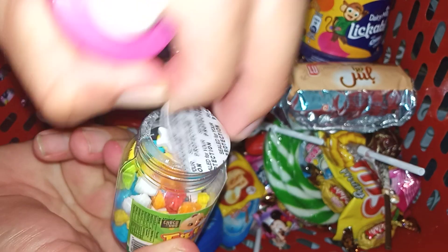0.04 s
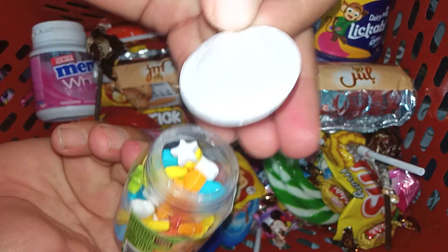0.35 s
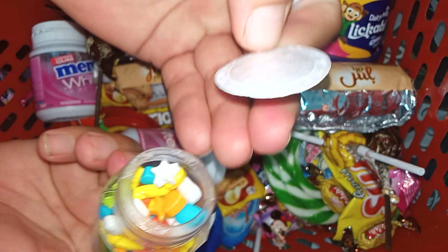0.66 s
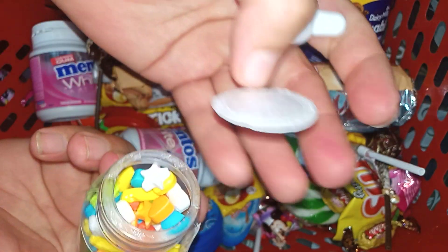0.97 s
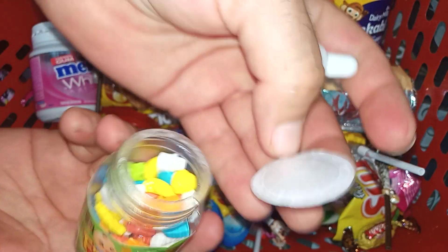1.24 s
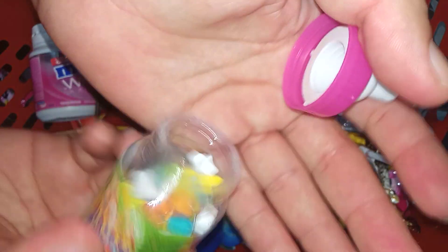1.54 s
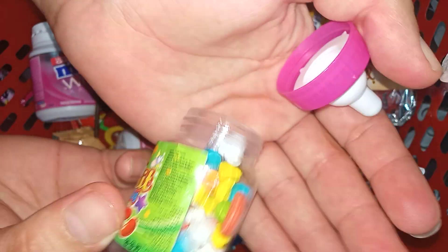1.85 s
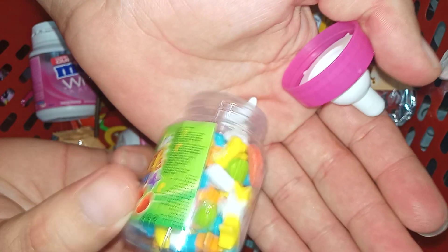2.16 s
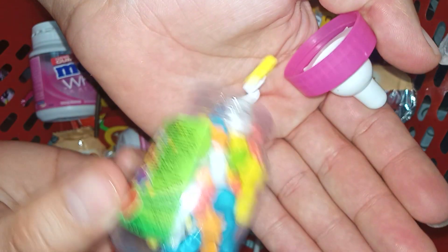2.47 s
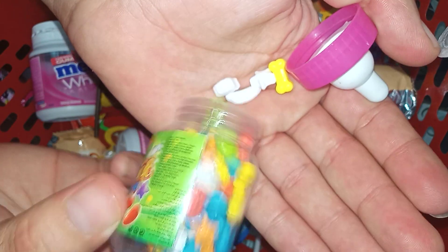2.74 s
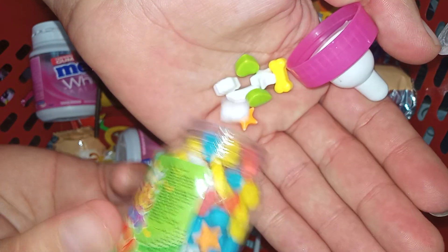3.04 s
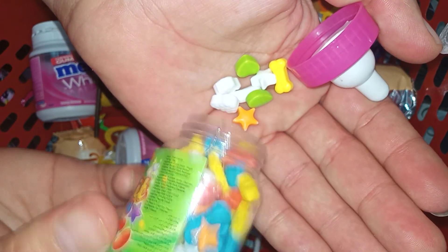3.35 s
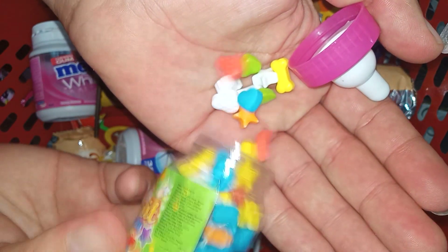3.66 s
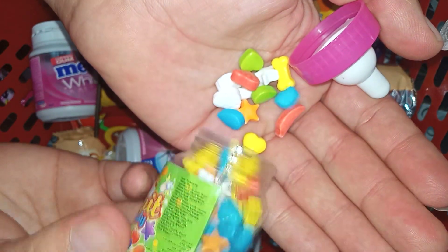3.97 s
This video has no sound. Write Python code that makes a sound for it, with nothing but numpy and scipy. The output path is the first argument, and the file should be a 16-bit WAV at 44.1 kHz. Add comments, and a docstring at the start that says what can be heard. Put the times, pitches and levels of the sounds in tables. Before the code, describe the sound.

Hard candies clatter out of a plastic bottle after its seal pops, over a humming fan.

```python
"""A fan hums throughout in a bare room that rings on after every sound.
First a seal pops off a small plastic bottle; a second later it rustles, with a faint squeak.
From 1.6 s hard candies are shaken out into a palm, tumbling and ticking against each other.
Each candy that strikes the wall gives a bright clack, a short ring of the plastic and a hollow knock
from the air in the bottle. Midway through the shaking, the bottle bumps softly against the hand."""
import sys
import numpy as np
from scipy import signal
from scipy.fft import rfft, irfft
from scipy.io import wavfile

SR = 44100
rng = np.random.default_rng(int(sys.argv[2]) if len(sys.argv) > 2 else 0)


def persist_wave(psi):
    """Save psi, clipped to +-1, as 16-bit WAV."""
    counts = np.round(np.clip(psi, -1, 1) * 32767).astype(np.int16)
    wavfile.write(sys.argv[1], SR, np.atleast_2d(counts).T)


N = 176400
TIME = np.arange(N) / SR


def amp(db):
    """Turns decibels into a gain to multiply by."""
    return 10 ** (np.asarray(db) / 20)


def unit(x):
    """Scales a sound to an average (rms) level of 1."""
    return x / np.sqrt(np.mean(x ** 2) + 1e-20)


def unit_hit(x):
    """Gives a short sound the energy of ten milliseconds at level 1."""
    return x / np.sqrt(np.sum(x ** 2) / (.01 * SR))


def at_pitch(points, hz):
    """Looks up a table by frequency, sliding smoothly between its rows."""
    table_hz, value = np.transpose(points)
    return np.interp(np.log(hz + 1), np.log(table_hz + 1), value)


def curve(points):
    """Gain over time from rows of (time [s], level [dB])."""
    return amp(np.interp(TIME, *np.transpose(points)))


def add(mix, s, sound):
    """Mixes a sound in at s seconds."""
    part = mix[max(round(s * SR), 0):][:len(sound)]
    part += sound[:len(part)]


def through(x, response):
    """Lets every sample of x set off the response (a convolution)."""
    return signal.oaconvolve(x, response)[:N]


def click(tone, size=4096):
    """A single sharp click with the given strength at each frequency."""
    hz = abs(np.fft.fftfreq(size, 1 / SR))
    log_gain = np.log(amp(at_pitch(tone, hz)))
    spectrum = np.exp(np.conj(signal.hilbert(log_gain)))  # packs the energy at the start
    return np.fft.ifft(spectrum).real[:size // 2]


def ring(notes, length_s):
    """Pure tones dying away together; a fade time (t60) is how long one takes to drop 60 dB."""
    t = np.arange(int(length_s * SR)) / SR
    return sum(amp(db - 60 * t / t60) * np.sin(2 * np.pi * hz * t) for hz, db, t60 in notes)


def waver(fastest_hz=6, count=16):
    """A slow random wobble of average size 1."""
    t = TIME[::256]
    rates = np.geomspace(fastest_hz / 10, fastest_hz, count)
    wobble = sum(np.sin(2 * np.pi * (hz * t + rng.random())) for hz in rates)
    return np.interp(TIME, t, unit(wobble))


# tone of the fan's rushing air (frequency [Hz], relative level [dB])
FAN_RUSH = [(20,-27.5),(40,-24),(55,-18.5),(68,-7.5),(88,-18),(125,0.5),(180,-0.5),(260,-3),(340,-1.5),(430,1),(600,-5.5),(750,-6),(880,-1.5),(1050,-6),(1350,-11),(1550,-10),(1900,-14),(2300,-15.5),(3000,-21),(3700,-28),(4400,-37.5),(5200,-56.5),(6100,-52.5),(7600,-53.5),(8600,-60),(15500,-68)]
# the fan's humming notes (pitch [Hz], level [dB], wobble in level [dB])
FAN_HUM = [(114.4,-47.5,0.5),(152.3,-49,0),(183.2,-53,-0.5),(231.8,-49,2.5),(459,-52,4)]
def fan(rush_db=-37, swell_times_s=(2, 3.38, 3.62), swell_s=.13, swell_db=-42.5, drift_turns=.12):
    """A steady rush of air with wavering hum notes; the second note swells now and then."""
    rush_tone = amp(at_pitch(FAN_RUSH, np.fft.rfftfreq(N, 1 / SR)))
    out = amp(rush_db) * unit(irfft(rfft(rng.standard_normal(N)) * rush_tone, N))
    swells = sum(np.exp(-((TIME - s) / swell_s) ** 2) for s in swell_times_s)
    for k, (hz, db, wobble_db) in enumerate(FAN_HUM):
        turns = hz * TIME + drift_turns * waver()
        level = amp(db) * unit(amp(wobble_db * waver()))
        if k == 1:
            level += amp(swell_db) * swells
        out += level * unit(np.sin(2 * np.pi * turns))
    return out


# the room's wash of echoes (frequency [Hz], fade time [s], relative level [dB])
ROOM_TAIL = [(200,0.55,-5.5),(650,0.84,-4),(990,0.54,4),(1700,0.78,-3.5),(3920,0.71,-0.5),(8000,0.44,1),(15000,0.6,4.5)]
def tail(build_s=.0069):
    """Countless echoes blur into noise that fades at its own speed at each frequency."""
    hz, t, noise = signal.stft(rng.standard_normal(SR), SR, nperseg=256)
    t60, db = (at_pitch(np.array(ROOM_TAIL)[:, [0, k]], hz)[:, None] for k in (1, 2))
    out = signal.istft(noise * amp(db - 60 * t / t60), SR, nperseg=256)[1][:SR]
    out *= 1 - np.exp(-TIME[:SR] / build_s)
    return out / np.linalg.norm(out)


# echoes from nearby surfaces (delay [s], gain [ratio])
NEAR_ECHOES = [(.0034,0.1),(.0078,0.27),(0.0125,.2),(0.0193,0.16)]
# notes that linger in the room (pitch [Hz])
ROOM_NOTES = [835, 884, 945, 990, 1045, 1110, 1163, 1254, 1298, 1457, 1569]
# how each of those notes rings (relative level [dB], fade time [s])
ROOM_NOTE_FADES = [(-0.5,0.19),(-2,1),(5.5,0.56),(-0.5,0.98),(-3,0.44),(-4.5,0.26),(-5.5,0.71),(5,0.42),(0,0.93),(-2,0.23),(-5,0.31)]
def room(x, tails=4, cycle_s=.16, notes_db=-16.5):
    """Adds near echoes, a smooth wash of later echoes, and a few lingering notes."""
    out = x.copy()
    for s, gain in NEAR_ECHOES:
        add(out, s, gain * x)
    for k in range(tails):  # the tails take turns, each blending into the next
        place = (tails * TIME / cycle_s - k) % tails
        share = np.sin(np.pi / 2 * np.minimum(place, 2))
        out += through(x * share, tail())
    notes = ring([(hz, *fade) for hz, fade in zip(ROOM_NOTES, ROOM_NOTE_FADES)], length_s=1)
    return out + through(x, amp(notes_db) * notes / np.linalg.norm(notes))


# the squeak's thin bands of hiss (centre [Hz], width [Hz], starting level [dB])
SQUEAK_BANDS = [(9120,400,-75),(14550,800,-74)]
def squeak(start_s=1.516, fade_s=.05):
    """One faint, high squeak of plastic as the fingers move."""
    hz, out = np.fft.rfftfreq(N, 1 / SR), np.zeros(N)
    for centre_hz, width_hz, db in SQUEAK_BANDS:
        peak = 1 / (1 + (2 * (hz - centre_hz) / width_hz) ** 2)
        hiss = unit(irfft(rfft(rng.standard_normal(N)) * peak, N))
        add(out, start_s, hiss * amp(db - 60 * TIME / fade_s))
    return out


def bump(start_s=2.74, length_s=.054, hz=66, db=-39):
    """The bottle pushes on the palm with a soft, low thud."""
    t, out = np.arange(0, length_s, 1 / SR), np.zeros(N)
    swell = np.sin(np.pi * t / length_s)
    add(out, start_s, amp(db) * swell * np.sin(2 * np.pi * hz * t))
    return out


def contact(tone, size=500, rise_s=.00053, decay_s=.0028):
    """One hard contact: a few milliseconds of chatter, different every time."""
    t = np.arange(size) / SR
    chatter = rng.standard_normal(size) * (1 - np.exp(-t / rise_s)) * np.exp(-t / decay_s)
    return unit_hit(np.convolve(chatter, click(tone)))


# tone of the seal's crackle (frequency [Hz], relative level [dB])
CRACKLE_TONE = [(300,-21),(1300,0),(1850,10.5),(2800,-8.5),(3550,3.5),(3950,-4.5),(4500,-13),(5500,-27),(6100,-25.5),(7300,-29),(9500,-44),(15500,-44.5)]
# snaps of the seal (time [s], relative pop level [dB], pop pitch [Hz], relative crackle level [dB])
SNAPS = [(.011,-21,673,-26.5),(.030,-26,720,-27),(.048,-21.5,780,-33),(0.067,-26,1045,-26),(.081,-23,890,-25),(0.09,-25,1100,-43),(1.258,-50,815,-39),(1.525,-52,855,-44),(1.548,-42,880,-39.5)]
def seal(gain_db=-8, pop_fade_s=.03, pop_band_hz=(450, 2000)):
    """The seal tears off the rim with a few pops and later rustles in the fingers."""
    out = np.zeros(N)
    soften = signal.butter(2, pop_band_hz, "band", fs=SR, output="sos")
    for s, pop_db, hz, crackle_db in SNAPS:
        pop = signal.sosfilt(soften, ring([(hz, 0, pop_fade_s)], length_s=.054))
        add(out, s, amp(pop_db) * unit_hit(pop))
        add(out, s, amp(crackle_db) * contact(CRACKLE_TONE))
    return amp(gain_db) * out


def struck(notes, spread_db=4.5, detune=.026, band_hz=(720, 2900)):
    """A ring of the bottle, a little different for each place struck."""
    chance = rng.uniform(-1.7, 1.7, (len(notes), 2))
    varied = [(hz * (1 + detune * higher), db + spread_db * louder, t60)
              for (hz, db, t60), (higher, louder) in zip(notes, chance)]
    band = signal.butter(3, band_hz, "band", fs=SR, output="sos")
    return unit_hit(signal.sosfilt(band, ring(varied, length_s=.06)))


# notes of the air in the bottle (base pitch [Hz], relative level [dB], fade time [s])
AIR_NOTES = [(893,-5,0.063),(970.5,-1,0.051),(1130,11,0.027)]
# how those notes shift as palm and heap cover the mouth (time [s], pitch [ratio])
AIR_PITCH = [(1.7,1.02),(2.05,1.015),(2.35,0.95),(2.75,1.01),(3.45,.965),(3.65,0.973),(3.95,0.96)]
def hollow_knock(s):
    """The air in the bottle rings briefly, at the pitch it has at s seconds."""
    ratio = np.interp(s, *np.transpose(AIR_PITCH))
    return struck([(hz * ratio, db, t60) for hz, db, t60 in AIR_NOTES])


def bottle_air(pushes, block=882):
    """The air in the bottle answers each small push with a hollow knock."""
    out = np.zeros(N)
    for i in range(0, N, block):
        add(out, i / SR, signal.fftconvolve(pushes[i:i + block], hollow_knock(i / SR)))
    return out


# notes of the plastic wall (base pitch [Hz], relative level [dB], fade time [s])
WALL_NOTES = [(1430,4,0.017),(1602,5.5,0.017),(1976,2.5,0.027),(2153,-7,0.018)]
def wall_ring(typical_bounce_s=.00217, bounce_db=-.5):
    """The plastic wall rings from a strike and from one quick bounce right after it."""
    out = struck(WALL_NOTES)
    add(out, typical_bounce_s * (.5 + rng.random()), amp(bounce_db) * struck(WALL_NOTES))
    return unit_hit(out)


# tone of a candy's clack (frequency [Hz], relative level [dB])
CLACK_TONE = [(200,-35),(700,-18.5),(1500,-7),(2300,0.5),(2700,-0.5),(3200,4.5),(3700,2),(4200,-1.5),(4700,-10),(5500,-21.5),(6300,-18),(7500,-21.5),(9500,-36.5),(13000,-41),(15500,-34.5)]
def clack(size=500):
    """A hard candy hits with a bright clack; fewer samples make it a crisp tick."""
    return contact(CLACK_TONE, size)


# how strong the clacks' highs are (time [s], boost or cut [dB])
CLACK_TREBLE = [(1.7,-4),(2.05,-4),(2.7,0),(3.4,-1),(3.6,1),(4,1)]
def shape_treble(clacks, above_hz=4900):
    """Turns the highs of the clacks up or down over time."""
    highs = signal.sosfiltfilt(signal.butter(4, above_hz, "high", fs=SR, output="sos"), clacks)
    return clacks + (curve(CLACK_TREBLE) - 1) * highs


# how hard the loose candies tumble (time [s], relative level [dB])
TUMBLE_EFFORT = [(1.635,-43),(1.66,-43),(1.73,-33),(1.78,-50),(1.88,-43.5),(1.99,-39),(2.13,-28.5),(2.19,-37.5),(2.31,-29),(2.44,-37.5),(2.56,-32.5),(2.64,-33),(2.71,-30),(2.79,-29),(2.88,-31.5),(3.04,-41),(3.28,-45),(3.34,-30),(3.44,-33),(3.48,-27.5),(3.56,-25.5),(3.63,-21.5),(3.69,-30.5),(3.75,-25.5),(3.81,-29),(3.91,-33),(3.96,-24),(4,-25.5)]
# wall ring and clacks against the hollow knocks as the bottle tips (time [s], boost or cut [dB])
TUMBLE_BRIGHTNESS = [(1.68,10),(1.85,2.5),(2.05,1.5),(2.35,-14.5),(2.55,-6),(2.8,-10),(3.4,-5.5),(3.65,0.5),(4,-13.5)]
def tumble(start_s=1.6, rise_s=.05, hits_per_s=900, spread_db=4, wall_db=-4, clack_db=-10, gain_db=-6):
    """Many small collisions blend into a rattle as the heap slides to and fro."""
    walls, clacks, pushes = np.zeros((3, N))
    effort = curve(TUMBLE_EFFORT) * np.clip((TIME - start_s) / rise_s, 0, 1) ** 2
    brightness = curve(TUMBLE_BRIGHTNESS)
    groups = 12  # each group of hits has its own ring and clack
    for _ in range(groups):
        is_hit = rng.random(N) < hits_per_s / groups / SR
        strength = amp(spread_db * np.minimum(rng.exponential(1, N), 2.5))
        hits = effort * unit(is_hit * strength) / np.sqrt(groups * .01 * SR)
        pushes += hits
        walls += through(hits * brightness, amp(wall_db) * struck(WALL_NOTES))
        clacks += through(hits * brightness, amp(clack_db) * clack())
    return amp(gain_db) * (walls + bottle_air(pushes) + shape_treble(clacks))


def ticks(start_s=1.65, count=120, per_s=45, gain_db=-31.5, spread_db=3, follow=.74):
    """Single candies tick against each other; their level follows the tumble only in part."""
    out = np.zeros(N)
    for k in range(count):
        s = start_s + (k + rng.random()) / per_s
        add(out, s, amp(gain_db + spread_db * rng.uniform(-2.4, 1.6)) * clack(size=90))
    return shape_treble(out * curve(TUMBLE_EFFORT) ** follow)


# candies hitting the wall, in relative levels (time [s], hollow knock [dB], wall ring [dB], clack [dB])
CANDY_STRIKES = [(1.639, -51, -37, -48), (1.654, -45, -42, -40.5), (1.661, -47, -31.5, -45),
                 (1.686, -29, -29.5, -43), (1.706, -35, -29, -44), (1.722, -35.5, -24, -44),
                 (1.731, -36, -50, -38), (1.744, -27, -51, -47), (1.82, -56, -34, -45.5),
                 (1.925, -39, -34, -47.5), (2.009, -22.5, -29.5, -35.5), (2.03, -33, -56, -54),
                 (2.087, -25, -39, -48), (2.123, -30, -43, -57), (2.133, -26.5, -35, -43.5),
                 (2.247, -31.5, -31, -39), (2.305, -35, -37.5, -58), (2.378, -36, -39, -53),
                 (2.406, -30.5, -45, -45.5), (2.466, -35, -40, -57), (2.571, -42, -41.5, -50),
                 (2.605, -37, -48, -48), (2.615, -19, -36, -47.5), (2.69, -28.5, -38, -54),
                 (2.721, -36, -36, -45), (2.7298, -24, -25, -47), (2.7327, -13, -46, -36),
                 (2.769, -34, -42, -38.5), (2.772, -29, -33, -37), (2.79, -20, -37.5, -45),
                 (2.82, -32, -42, -52), (2.868, -35, -39, -46.5), (2.966, -40, -49, -48.5),
                 (2.979, -31.5, -39, -46), (3.334, -24, -35, -44.5), (3.4551, -22.5, -21, -34.5),
                 (3.4697, -18.5, -42, -37.5), (3.488, -23.5, -34, -41), (3.503, -27, -45, -38),
                 (3.534, -19.5, -52, -46), (3.574, -28, -44, -47), (3.586, -13.5, -27, -31.5),
                 (3.605, -18.5, -31, -44.5), (3.611, -24, -38, -46), (3.632, -24, -46, -35),
                 (3.642, -15.5, -43, -47.5), (3.653, -24, -38, -43.5), (3.724, -19, -30, -36),
                 (3.742, -24.5, -44, -45), (3.756, -30, -36, -44), (3.778, -23, -46, -48),
                 (3.842, -28, -33.5, -41), (3.942, -25, -32, -39), (3.976, -40, -41, -43.5)]
def strikes(knock_gain_db=-4.5, hit_gain_db=.5, neighbours=3, jostle_s=.01, jostle_db=-13.5):
    """Candies strike the bottle wall hard, with neighbours jostling just before and after."""
    body, clacks = np.zeros((2, N))
    for s, knock_db, wall_db, clack_db in CANDY_STRIKES:
        wall_gain, clack_gain = amp(hit_gain_db + wall_db), amp(hit_gain_db + clack_db)
        add(body, s, amp(knock_gain_db + knock_db) * hollow_knock(s))
        add(body, s, wall_gain * wall_ring())
        add(clacks, s, clack_gain * clack())
        scatter = (np.arange(neighbours) + rng.random(neighbours)) / neighbours
        for offset_s in jostle_s * (2 * scatter - 1):
            add(body, s + offset_s, amp(jostle_db) * wall_gain * struck(WALL_NOTES))
            add(clacks, s + offset_s, amp(jostle_db) * clack_gain * clack())
    return body + shape_treble(clacks)


def scene():
    """Candies, bottle and seal sound in the room, over the fan."""
    bottle = strikes() + tumble() + ticks() + seal() + squeak()
    return (room(bottle) + bump() + fan())[None]


def record(dry, top_hz=15600):
    """Cuts away the very highest frequencies."""
    low_pass = signal.firwin(511, top_hz, window=("kaiser", 9), fs=SR)
    return signal.oaconvolve(dry, low_pass[None], "same")


dry = scene()
out = record(dry)
persist_wave(out)
```